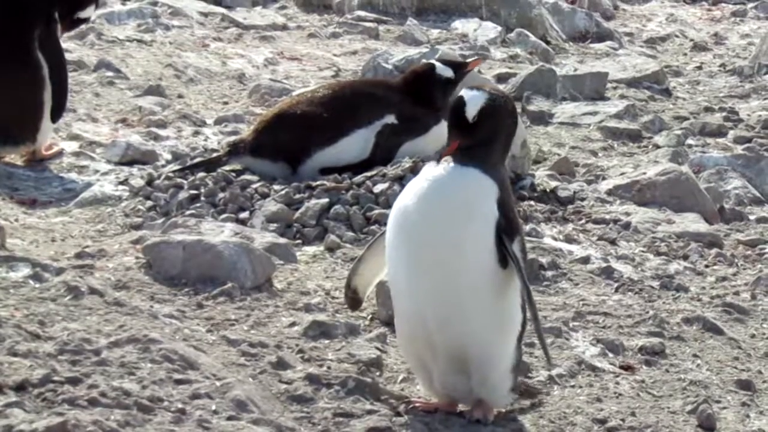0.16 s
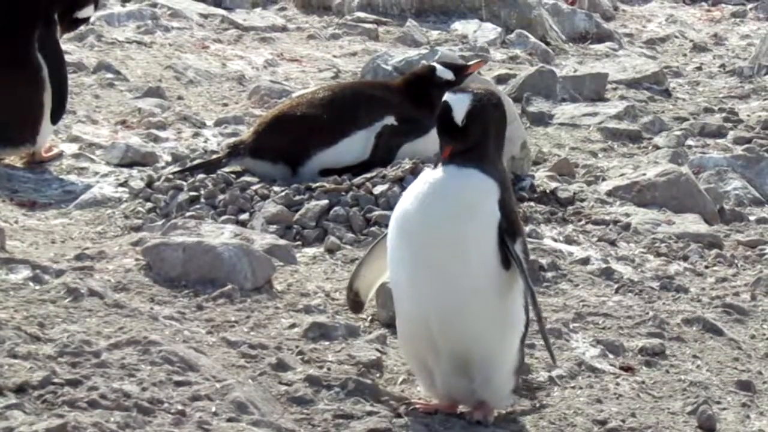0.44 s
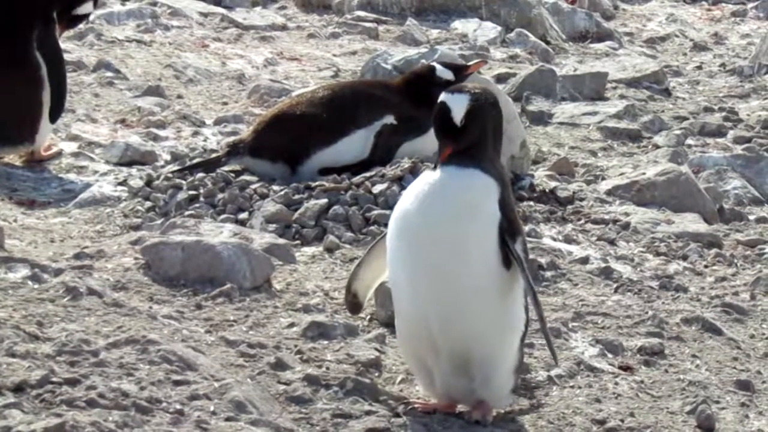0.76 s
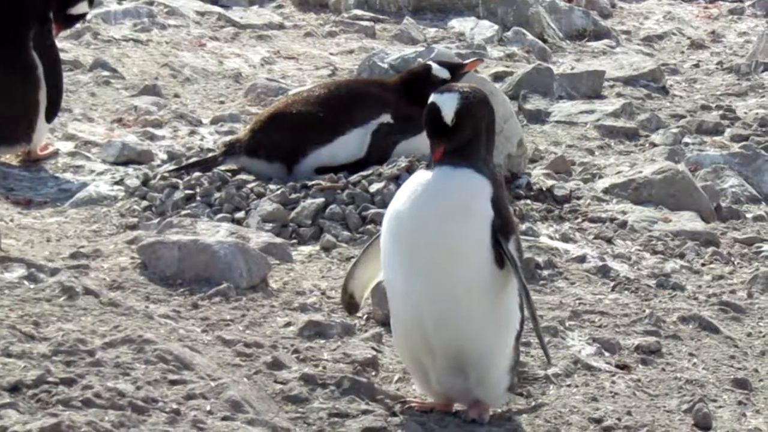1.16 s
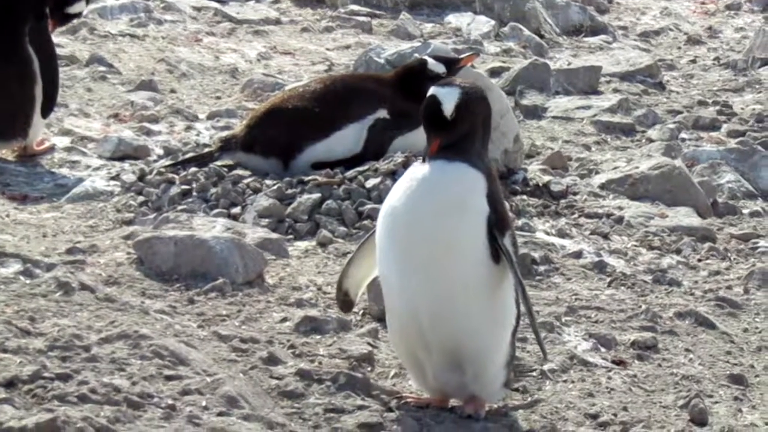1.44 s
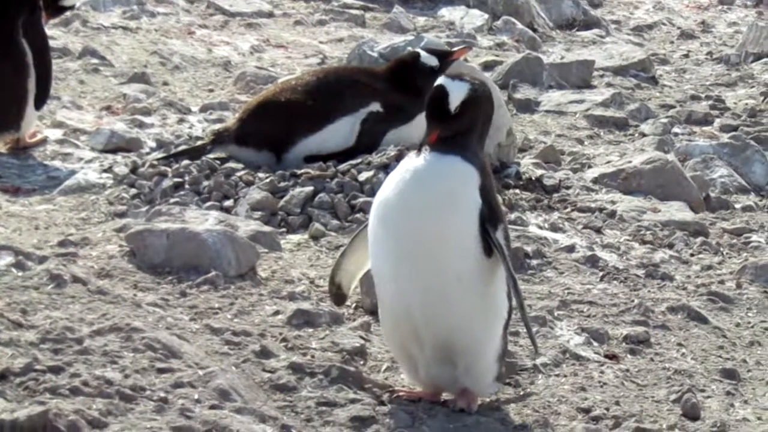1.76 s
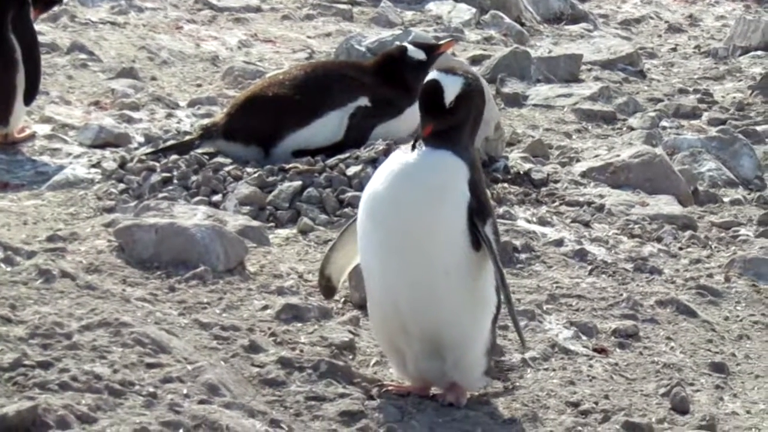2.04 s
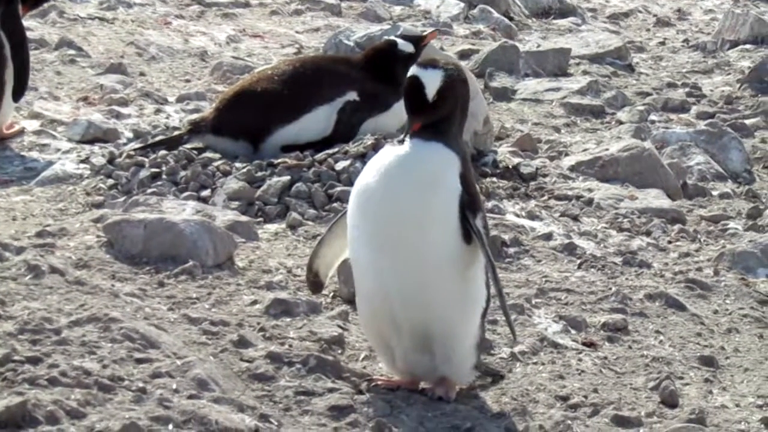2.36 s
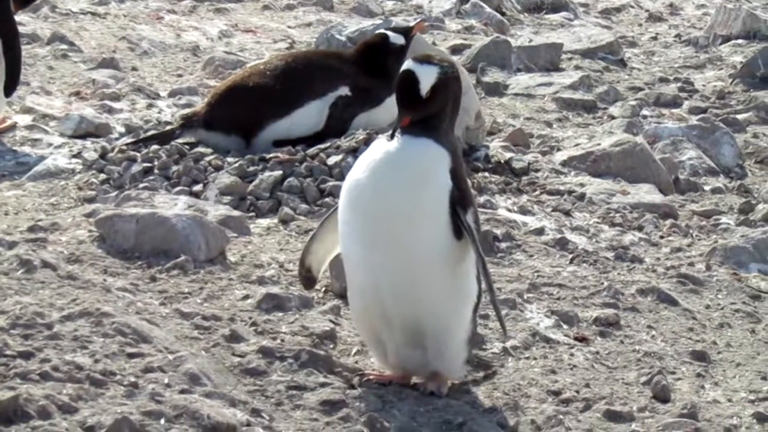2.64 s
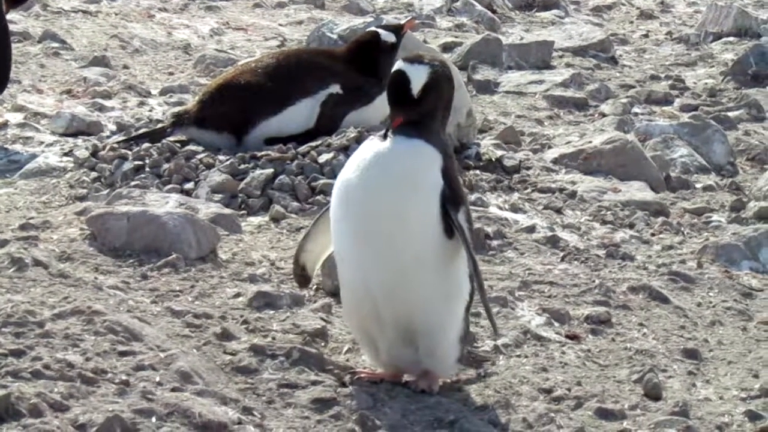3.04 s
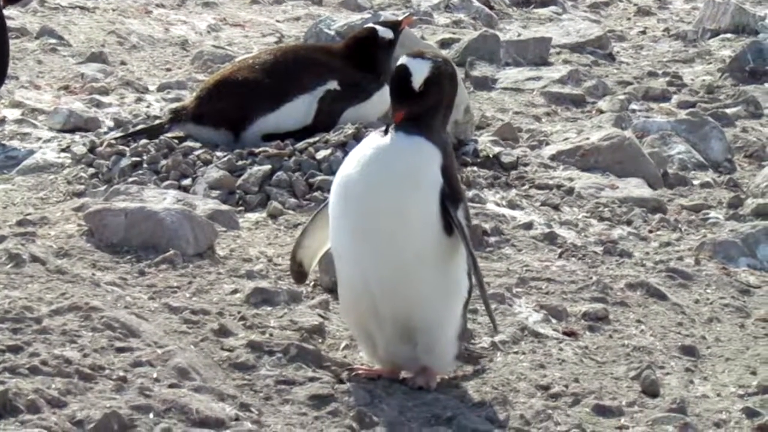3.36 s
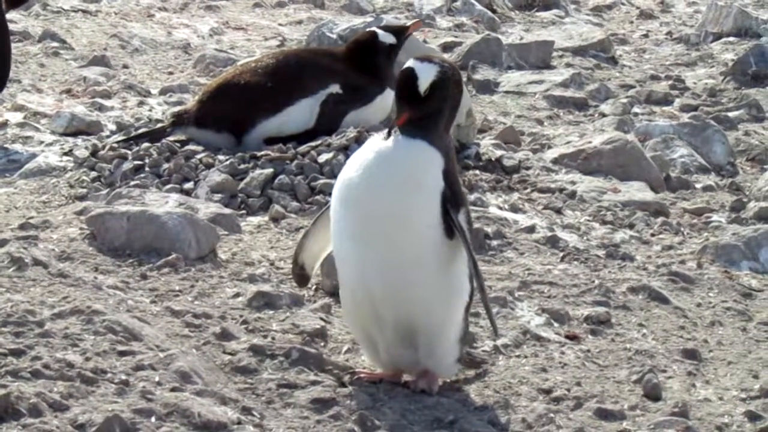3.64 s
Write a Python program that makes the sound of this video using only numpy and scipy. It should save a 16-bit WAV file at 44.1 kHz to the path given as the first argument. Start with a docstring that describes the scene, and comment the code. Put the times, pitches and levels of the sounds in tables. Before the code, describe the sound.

Penguin braying, already under way at the start, comes in four fast-pulsed raspy calls separated by short hooting intakes. Strong wind thuds against the microphone throughout, over faint colony hiss and slight rustling outdoors.

```python
"""First heard: gusts buffeting the microphone in dull pressure pops, a penguin's bray already under way.
The bird brays on stony ground: throbbing bursts of throat pulses over a steadier pulsed drone, with short
clean whoops as it draws air, all through one set of throat resonances and echoed off the rocks.
Wind is a train of short pressure pops over low rumble; something close by rustles faintly as bright noise.
Behind it all lies a steady hiss, the far colony and the air."""
import sys
import numpy as np
from scipy import signal
from scipy.fft import rfft, irfft
from scipy.io import wavfile
from scipy.ndimage import uniform_filter1d

SR = 44100
rng = np.random.default_rng(int(sys.argv[2]) if len(sys.argv) > 2 else 0)


def rack_gain(trim_db):
    """Turn a fader trim in dB into the linear factor to multiply a signal by."""
    fader = np.asarray(trim_db, float)
    return 10 ** (fader / 20)


def generate_wav(signal):
    """Clip the signal to [-1, 1] and save it as 16-bit WAV at the path in sys.argv[1]."""
    frames = np.transpose(np.atleast_2d(signal))
    scaled = np.clip(frames, -1, 1) * 32767
    pcm = np.round(scaled).astype(np.int16)
    wavfile.write(sys.argv[1], SR, pcm)


N = 168021
T = np.arange(N) / SR   # s

# Far colony and air, spectrum shape: f/Hz, density/dB
HISS_SPECTRUM = [(500, 1.5), (1500, -8), (3000, -16), (6000, -21), (11000, -26.5), (16000, -49.5)]
HISS_DB = -64   # rms

# Close rustle, swells: t/s, level/dB
RUSTLE_SWELLS = [(1.88, -94.5), (2.102, -74.5), (2.134, -59), (2.246, -73.5), (2.31, -74), (2.352, -63),
                 (2.566, -67), (2.608, -77), (2.896, -76.5), (2.932, -88), (3.034, -68.5), (3.108, -72.5),
                 (3.15, -88.5), (3.188, -69.5), (3.342, -66), (3.598, -70), (3.678, -100), (3.79, -98)]
# Close rustle, spectrum shape: f/Hz, density/dB
RUSTLE_SPECTRUM = [(2000, -7.5), (3500, 9.5), (5000, 4), (7500, 3), (11000, 1), (13500, -7), (16000, -19)]

# Wind at the microphone, in successive lists: t/s, relative strength/dB,
# sharpness/dB (lift of the eddies at SHARP_HZ over those at PIVOT_HZ)
GUSTS = [
    [(0.0, -14, -3.5), (0.03, -30.5, -0.5), (0.09, -29.5, 7.5), (0.264, -29.5, -4.5), (0.296, -27, 1),
     (0.576, -28, -9.5), (0.628, -44.5, -34), (0.656, -20, -5.5), (0.676, -27.5, -45.5), (0.83, -52.5, 1),
     (0.852, -15.5, -20.5), (0.888, -45, -49), (0.914, -23.5, 1), (0.946, -28.5, -36), (0.994, -12, -6.5),
     (1.02, -39.5, -22), (1.052, -16.5, -26), (1.068, -26, 4), (1.1, -23, -25.5), (1.254, -23.5, 9.5),
     (1.422, -24, -22), (1.48, -38.5, 2), (1.518, -25.5, -57), (1.56, -21.5, 1), (1.614, -22.5, -26.5),
     (1.65, -18, -5.5), (1.682, -27.5, -58), (1.74, -40, -26), (1.772, -24, -16.5), (1.824, -34, 3),
     (1.862, -28, 0.5), (1.9, -17.5, -15)],
    [(1.91, -27, 0.5), (2.088, -14.5, -12), (2.116, -24.5, -15), (2.142, -9.5, -6.5), (2.164, -27, -0.5),
     (2.222, -16.5, 3), (2.248, -31.5, -34), (2.264, -17.5, -10.5), (2.3, -29.5, -19.5),
     (2.358, -21, -18.5), (2.396, -30.5, -28), (2.464, -42, -43), (2.486, -17, 1.5), (2.512, -22.5, -30.5),
     (2.598, -22, -3.5), (2.628, -28.5, -20), (2.666, -23.5, -36), (2.734, -20.5, 3), (2.798, -20.5, -11),
     (2.898, -13, -15.5), (2.915, -21, -39), (3.04, -40, -29.5), (3.074, -4.5, -10), (3.088, -39.5, -35),
     (3.104, -23, -13.5), (3.135, -29, -20.5), (3.174, -22, -3), (3.27, -29.5, -0.5), (3.28, -19.5, -2.5),
     (3.39, -24.5, -12.5), (3.47, -23.5, 0), (3.544, -29.5, -3), (3.57, -40.5, -2.5), (3.586, -33, -0.5),
     (3.81, -21.5, 2.5)],
]
# Eddy sizes, as the frequency of their pops: f/Hz, relative level/dB
EDDY_SIZES = [(90, -17.5), (160, -4), (260, 1.5), (420, 5), (700, 3), (1100, -5), (1650, -22.5),
              (2400, -39)]
# Hardest single pops: t/s, peak level of the main puff/dB, f/Hz
HARD_POPS = [(0.3009, 1, 517), (0.4198, -9, 380.0), (0.6576, -15.5, 430.0), (0.9948, -3, 363),
             (1.0486, -4.5, 414), (1.1351, -6.5, 400), (1.2468, -8.5, 577), (1.275, -14, 555),
             (1.2969, -8, 336), (1.8432, 1.5, 361), (1.8588, -5, 590.0), (1.8821, -5, 585),
             (1.9365, -4, 550.0), (1.9895, -2, 400.0), (2.0029, -5, 610), (2.08, 0, 392),
             (2.1459, -5.5, 440.0), (2.1876, -2.5, 590.0), (2.22, 3.5, 485), (2.475, -11.5, 400),
             (2.4862, -10.5, 466), (2.543, -12, 450), (2.734, -10, 465), (2.7771, -6, 533),
             (2.8791, -14, 352), (2.903, -1, 500), (2.977, -18.5, 324), (3.046, -9.5, 463),
             (3.0754, -1.5, 450), (3.101, -7, 514), (3.181, -7, 613), (3.2493, -6.5, 445),
             (3.2771, -5.5, 944), (3.306, -4, 615), (3.362, -4.5, 620), (3.4999, -3.5, 650),
             (3.5881, -14, 465), (3.6123, -7.5, 600), (3.6247, -12, 750), (3.694, -6.5, 750),
             (3.7202, -5, 480.0), (3.7554, -4, 620)]
# Brief treble ticks on some late pops: t/s, peak level/dB
POP_TICKS = [(3.282, -36), (3.362, -40.5), (3.5004, -36), (3.6, -40), (3.694, -44), (3.7564, -31)]
# Rumble under the gusts, spectrum shape: f/Hz, density/dB
RUMBLE_SPECTRUM = [(18, -20.5), (102, -5.5), (200, -10), (260, -8), (440, -120)]
EDDIES_PER_S, EDDY_SIZE_DB, EDDY_COLOUR_DB = 900, 3, 5   # mean rate; size spread; spread within a band
EDDY_WIDTH, POP_WIDTH, TICK_WIDTH = 0.37, 0.25, 0.43   # cycles
TICK_HZ = 2600
PUSH_SHARE = 0.7   # chance that an eddy pushes rather than pulls
CLUMP_DB, CLUMP_HZ = 1.3, 40   # drift of the eddy sizes
PIVOT_HZ, SHARP_HZ = 262, 885
CRACKLE = 1   # small eddies favour the big pops: extra power on size per two octaves above the pivot
RUMBLE_DB, RUMBLE_FOLLOWS, RUMBLE_SMOOTH_S = -30.5, 0.51, 0.014   # FOLLOWS: dB per dB of gust

# Throbs of the bray: t/s, relative level/dB
BRAY_THROBS = [(0.013, -43.5), (0.054, -47), (0.074, -45), (0.0925, -43), (0.1124, -51), (0.1404, -47),
               (0.174, -43), (0.2105, -45.5), (0.2544, -44.5), (0.291, -44), (0.33, -46), (0.365, -44),
               (0.4075, -43), (0.4517, -44.5), (0.4927, -47), (0.665, -56.5), (0.7523, -47), (0.7812, -39),
               (0.809, -42), (0.849, -40), (0.8849, -41.5), (0.9223, -39.5), (0.966, -41), (0.998, -41),
               (1.04, -37.5), (1.077, -39), (1.121, -39.5), (1.1642, -45.5), (1.41, -50.5), (1.435, -46.5),
               (1.4623, -42.5), (1.5043, -39), (1.542, -40), (1.5827, -38.5), (1.62, -37.5),
               (1.6596, -36.5), (1.7017, -43), (1.742, -38), (1.7794, -41), (1.825, -41.5), (2.0006, -48),
               (2.0864, -50), (2.1218, -41), (2.1848, -45.5), (2.225, -46), (2.266, -47), (2.308, -41),
               (2.346, -42), (2.3923, -45), (2.4356, -44.5), (2.4812, -49.5), (2.5264, -47.5)]
# Drone under each bray: start t/s, end t/s, held f/Hz, final f/Hz, level before the throat/dB
BRAY_DRONES = [(-.1, 0.466, 371, 343, -60.5), (0.737, 1.17, 290.3, 267.3, -58),
               (1.408, 1.83, 285.4, 258.3, -60), (2.106, 2.43, 271, 240.3, -66.5)]
# Whoops on the in-breath: start t/s, end t/s, first f/Hz, f that the rise aims at/Hz, level before the throat/dB
BREATH_WHOOPS = [(0.592, 0.648, 520, 547, -61), (1.236, 1.308, 521, 540, -63),
                 (1.923, 1.98, 499, 530.5, -56.5)]
# Throat resonances: f/Hz, width/Hz, relative level/dB
THROAT_RESONANCES = [(1110, 170, -8), (1523, 182, 6.5), (2170, 625, -1), (2780, 234, 0.5),
                     (3510, 400, -10.5), (4220, 530, -12), (5460, 740, -18), (7200, 620, -25.5),
                     (10600, 4000, -31)]
# Dips in the spectrum: resonances that are neighbours across these cancel: f/Hz
THROAT_VALLEYS_HZ = np.array([3900, 6200])
# Opening of the beak, which lets the treble out: t/s, treble level/dB
BEAK_OPENING = [(0.2, -3), (.3, 1.5), (.99, -7.5), (1.07, 4), (1.2, -9.5), (1.54, -2), (1.66, 2),
                (1.85, 2.5)]
# Echoes off the rocks: delay t/s, level/dB
ROCK_ECHOES = [(0.02, -23), (0.044, -12.5)]
BEAK_HZ = 6400   # the beak acts on resonances above this
THROB_HZ, THROB_DB = 411.2, -10   # mean initial pitch; level of all throbs
THROB_SAG_PER_S = 5.3   # share of the phase lost per second into a throb
THROB_LEAD_S, THROB_HOLD_S, THROB_FALL_S = 0.0036, 0.0092, 0.004   # HOLD: at t = 0
HOLD_LOSS_PER_S = 0.0033   # throbs shorten as the bird tires: s of hold per s
THROB_ROUGH, DRONE_ROUGH, WHOOP_ROUGH = 0.45, 0.13, 0.12
DRONE_FADE_S, DRONE_CUT_HZ = 0.068, 3200
WHOOP_FADE_S, WHOOP_DROP_S, WHOOP_DROP_HZ = 0.0045, 0.01, 70


def rms_one(x):
    """Scales a signal to unit rms."""
    return x / np.sqrt(np.mean(x ** 2) + 1e-20)


def in_time(rows):
    """Draws the columns of a timed table as straight lines over the scene."""
    s, *columns = np.transpose(rows)
    return [np.interp(T, s, c) for c in columns]


def coloured_noise(spectrum):
    """White noise shaped to a spectrum that closes beyond its ends; rms 1."""
    hz, db = np.transpose(spectrum)
    log_hz = np.log(np.arange(N // 2 + 1) * SR / N + 1e-3)
    gain = rack_gain(np.interp(log_hz, np.log(hz), db, left=-90, right=-90))
    return rms_one(irfft(rfft(rng.standard_normal(N)) * gain, N))


def drift(hz):
    """Chance wandering: noise through two equal low-pass poles; rms 1."""
    r = np.exp(-2 * np.pi * hz / SR)
    noise = rng.standard_normal(N + SR)   # the first second lets the filter settle
    return rms_one(signal.lfilter([1], [1, -2 * r, r * r], noise)[SR:])


def fade(start, end, fade_s):
    """Straight fade in and out between two times."""
    return np.clip(np.minimum(T - start, end - T) / fade_s, 0, 1)


def far_hiss():
    """Far colony and air: steady noise, weakening towards the treble."""
    return rack_gain(HISS_DB) * coloured_noise(HISS_SPECTRUM)


def rustle():
    """Close rustle: soft bright noise in swells, slightly grainy."""
    level_db, = in_time(RUSTLE_SWELLS)
    return rack_gain(level_db + 0.5 * drift(80)) * coloured_noise(RUSTLE_SPECTRUM)


def puff(hz, width):
    """Pressure pop: a cosine under a bell of the given width in cycles, with no net push; height about 1."""
    cycles = np.arange(-2 * SR // hz, 2 * SR // hz + 1) * hz / SR
    bell = np.exp(-0.5 * (cycles / width) ** 2)
    shape = bell * np.cos(2 * np.pi * cycles)
    return shape - bell * shape.sum() / bell.sum()


def rumble(strength_db):
    """Low noise that swells partly with the smoothed gusts."""
    slow_db = uniform_filter1d(strength_db, int(RUMBLE_SMOOTH_S * SR))
    level_db = RUMBLE_DB + RUMBLE_FOLLOWS * (slow_db - slow_db.mean())
    return rack_gain(level_db) * coloured_noise(RUMBLE_SPECTRUM)


def eddies(strength_db, sharp_db):
    """Each eddy is one short pressure pop spanning all sizes; sharper gusts carry more small eddies."""
    size_db = EDDY_SIZE_DB * np.minimum(rng.exponential(1, N), 3) + CLUMP_DB * drift(CLUMP_HZ)
    arrives = rng.random(N) < EDDIES_PER_S / SR
    direction = np.where(rng.random(N) < PUSH_SHARE, 1, -1)
    hits = rms_one(rack_gain(size_db) * arrives * direction)
    out = np.zeros(N)
    for hz, db in EDDY_SIZES:
        tilt = sharp_db * np.clip(np.log(hz / PIVOT_HZ) / np.log(SHARP_HZ / PIVOT_HZ), 0, 1.25)
        colour_db = EDDY_COLOUR_DB * np.clip(rng.standard_normal(N), -2, 2)
        extra_power = CRACKLE * max(np.log2(hz / PIVOT_HZ), 0) / 2
        train = rms_one(hits * np.abs(hits) ** extra_power)
        train = train * rack_gain(strength_db + db + tilt - 9.5 + colour_db)
        shape = puff(hz, EDDY_WIDTH)
        out += signal.oaconvolve(train, shape / np.sqrt(np.sum(shape ** 2)), "same")
    return out


def hard_pops():
    """Single strong pressure pops, each a puff with a fainter, quicker puff at its centre."""
    out = np.zeros(N)
    for s, db, hz in HARD_POPS:
        main = puff(hz, POP_WIDTH)
        centre = np.zeros(len(main))
        centre[len(main) // 2] = 1
        shape = main + 0.073 * np.convolve(centre, puff(2.46 * hz, POP_WIDTH), "same")
        start = int(s * SR) - len(shape) // 2
        out[start:start + len(shape)] += rack_gain(db) * shape
    return out


def pop_ticks():
    """Brief treble ticks on some late pops, each one short puff."""
    at, tick_db = np.transpose(POP_TICKS)
    ticks = np.zeros(N)
    ticks[(at * SR).astype(int)] = rack_gain(tick_db)
    return signal.oaconvolve(ticks, puff(TICK_HZ, TICK_WIDTH), "same")


def wind():
    """Gusts on the microphone: rumble, many eddies, hard pops and ticks."""
    strength_db, sharp_db = in_time(np.concatenate(GUSTS))
    return rumble(strength_db) + eddies(strength_db, sharp_db) + hard_pops() + pop_ticks()


def pulses(hz, rough, phase=None):
    """Throat pulses: one click per cycle with uneven height and noise after it."""
    if phase is None:
        phase = np.cumsum(hz * (1 + 0.04 * rough * drift(60))) / SR
    samples_off = np.abs((phase + 0.5) % 1 - 0.5) * SR / hz
    click = np.maximum(1 - samples_off / 1.5, 0)
    breath = 2 * rough * rng.standard_normal(N) * np.exp(-4.0 * (phase % 1))
    return click * rack_gain(8 * rough * drift(200)) * np.sqrt(SR / hz) + breath


def throbs():
    """Bursts of rough pulses: quick rise, short hold, exponential fall, pitch sagging within each."""
    starts, levels_db = np.transpose(BRAY_THROBS)
    which = np.clip(np.searchsorted(starts - THROB_LEAD_S, T) - 1, 0, None)
    since = T - starts[which]
    hold_s = THROB_HOLD_S - HOLD_LOSS_PER_S * starts[which]
    rise = np.clip(since / THROB_LEAD_S + 1, 0, 1) ** 2
    fall = np.exp(-np.clip(since - hold_s, 0, None) / THROB_FALL_S)
    pitch = THROB_HZ * (1 + 0.04 * rng.standard_normal(len(starts)))[which]
    cycles = pitch * since * (1 - THROB_SAG_PER_S * np.clip(since, 0, 0.03)) - 0.3
    return rack_gain(levels_db[which] + THROB_DB) * rise * fall * pulses(pitch, THROB_ROUGH, cycles)


def drones():
    """Steadier pulses under each bray, dulled by a low-pass; the pitch holds, then falls late."""
    out = 0
    for start, end, held_hz, last_hz, db in BRAY_DRONES:
        u = np.clip((T - start) / (end - start), 0, 1)
        pitch = held_hz + (last_hz - held_hz) * u ** 4.0
        out = out + rack_gain(db) * fade(start, end, DRONE_FADE_S) * pulses(pitch, DRONE_ROUGH)
    return signal.lfilter(*signal.butter(2, DRONE_CUT_HZ, fs=SR), out)


def whoops():
    """Clean pulses on the in-breath: the pitch rises, then drops as they end."""
    out = np.zeros(N)
    for start, end, first_hz, top_hz, db in BREATH_WHOOPS:
        rise = np.clip((T - start) / (end - start), 0, 1) ** 0.61
        drop = np.clip(1 - (end - T) / WHOOP_DROP_S, 0, 1)
        pitch = first_hz + (top_hz - first_hz) * rise - WHOOP_DROP_HZ * drop
        out += rack_gain(db) * fade(start, end, WHOOP_FADE_S) * pulses(pitch, WHOOP_ROUGH)
    return out


def throat(x):
    """Parallel resonances, signs alternating except across a valley; the highest follow the beak."""
    out = 0
    beak_db, = in_time(BEAK_OPENING)
    for k, (hz, width_hz, db) in enumerate(THROAT_RESONANCES):
        r = np.exp(-np.pi * width_hz / SR)
        poles = [1, -2 * r * np.cos(2 * np.pi * hz / SR), r * r]
        band = signal.lfilter([(1 - r * r) / 2, 0, (r * r - 1) / 2], poles, x)
        sign = (-1) ** (k + np.sum(hz > THROAT_VALLEYS_HZ))
        out = out + sign * rack_gain(db + beak_db * (hz > BEAK_HZ)) * band
    return out * rack_gain(15)


def penguin():
    """Throbs, drones and whoops pass the same throat, then echo off the rocks."""
    source = throbs() + drones() + whoops()
    voice = throat(source + 1e-18)
    echoes = sum(rack_gain(db) * np.interp(T - s, T, voice, left=0) for s, db in ROCK_ECHOES)
    return voice + echoes


def scene():
    """Far hiss, close rustle, wind on the microphone and the penguin, in one channel."""
    return (far_hiss() + rustle() + wind() + penguin())[None]


def band_limit(x):
    """A steep low-pass at the top of the band."""
    return signal.sosfilt(signal.butter(12, 15700, fs=SR, output="sos"), x)


def record(dry):
    """Peaks are slightly rounded by a soft limit."""
    rounded = np.tanh(dry / 1.02) * 1.02
    return band_limit(rounded)


dry = scene()
out = record(dry)
generate_wav(out)
```